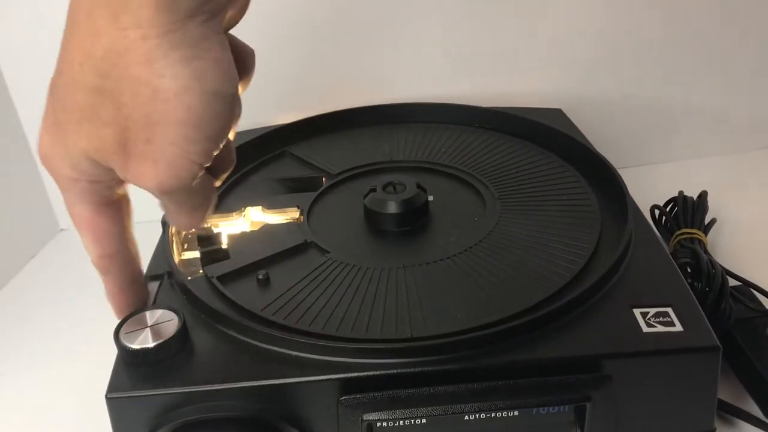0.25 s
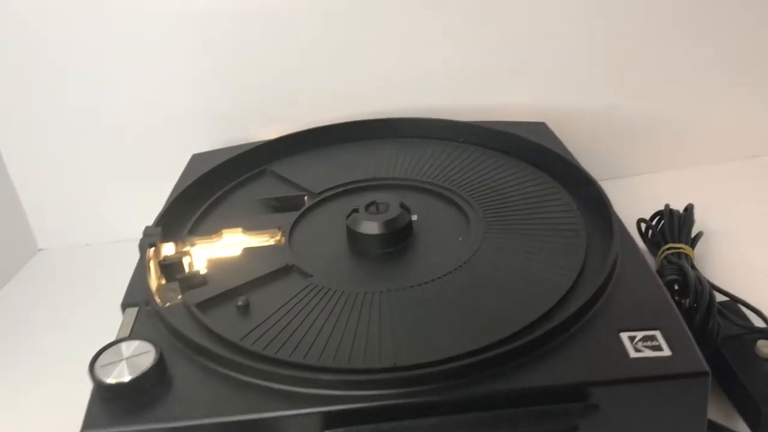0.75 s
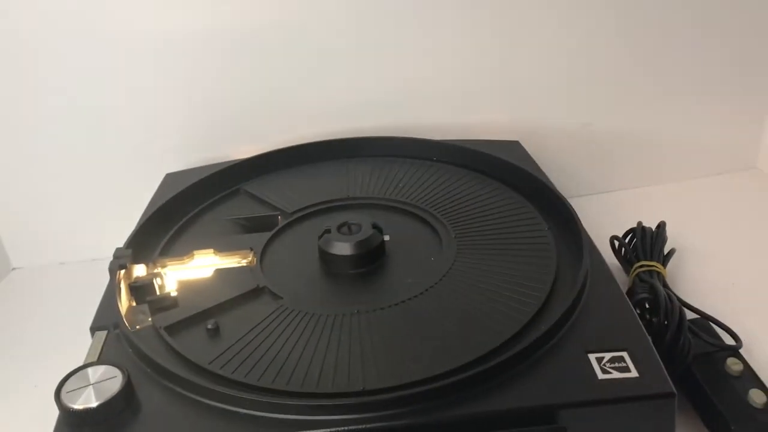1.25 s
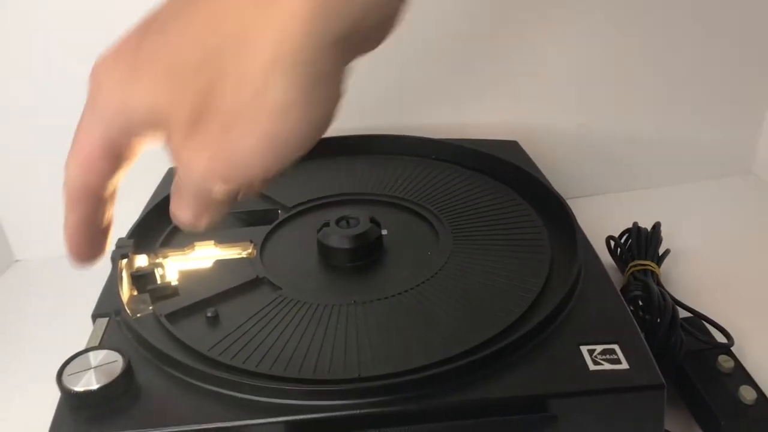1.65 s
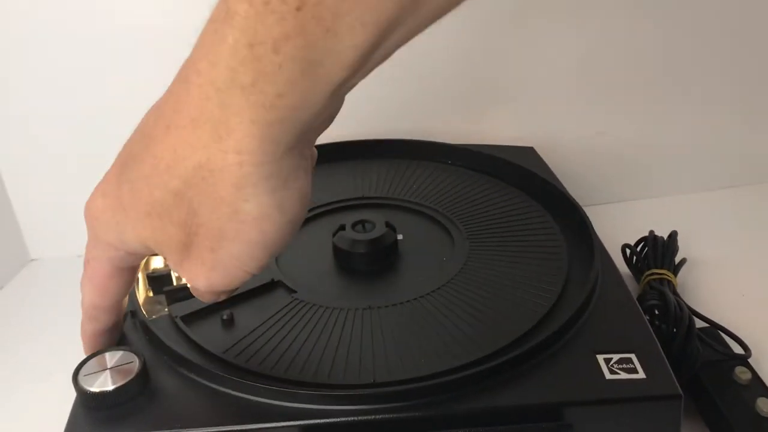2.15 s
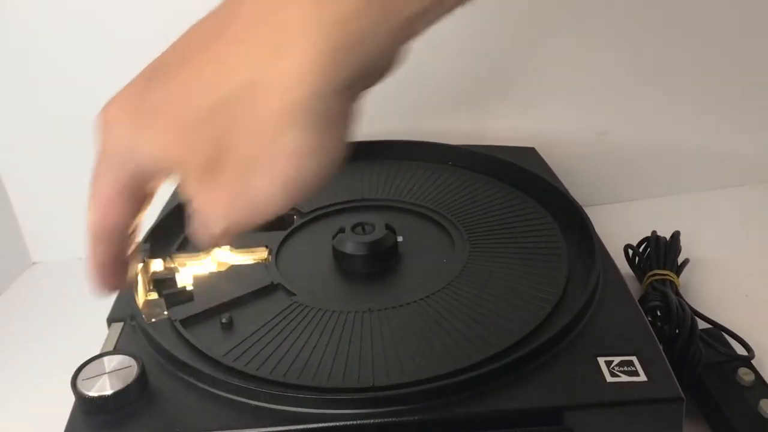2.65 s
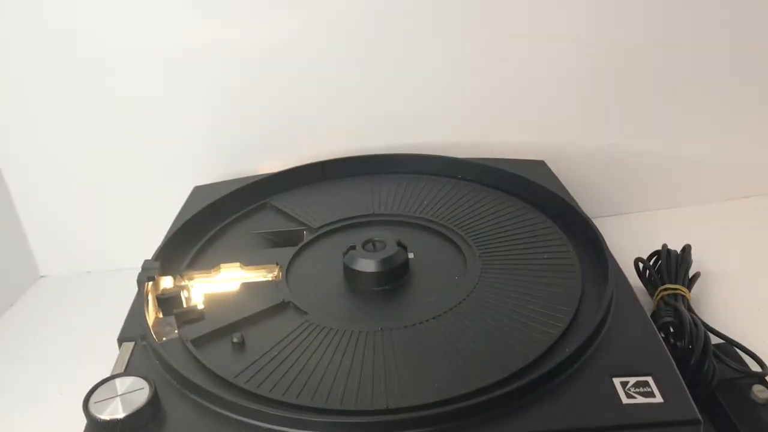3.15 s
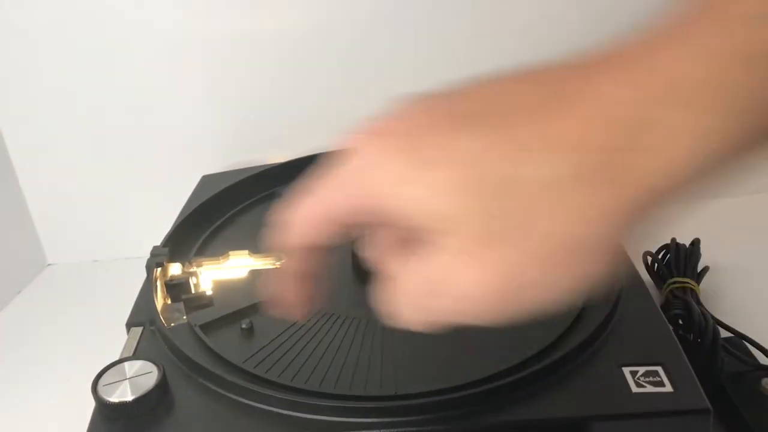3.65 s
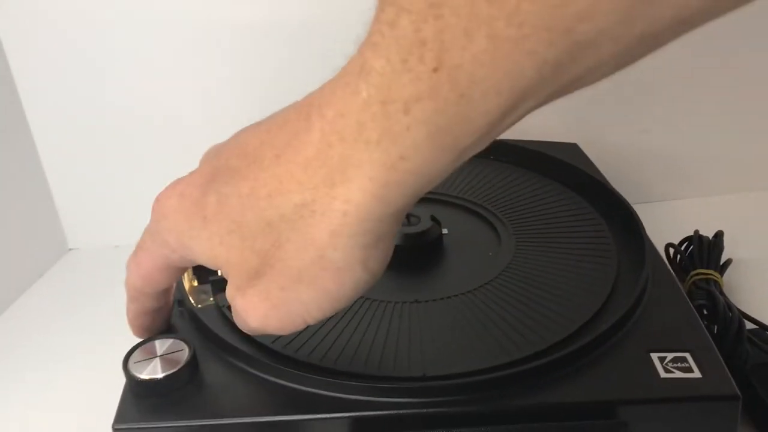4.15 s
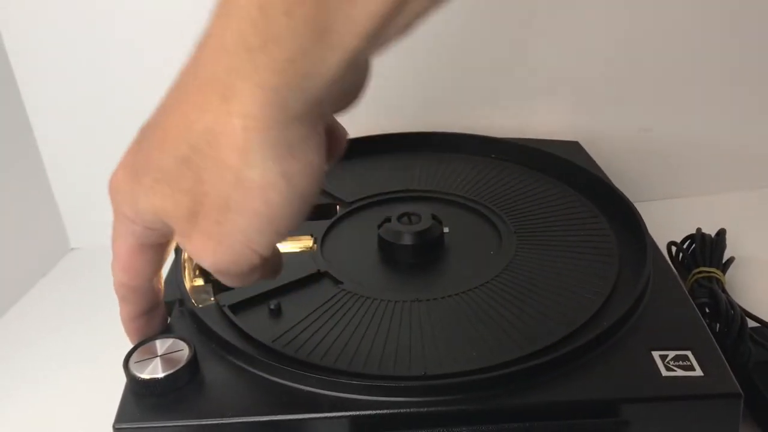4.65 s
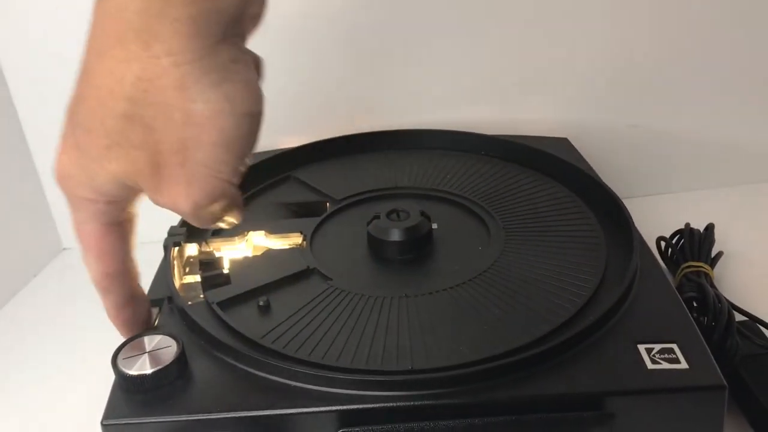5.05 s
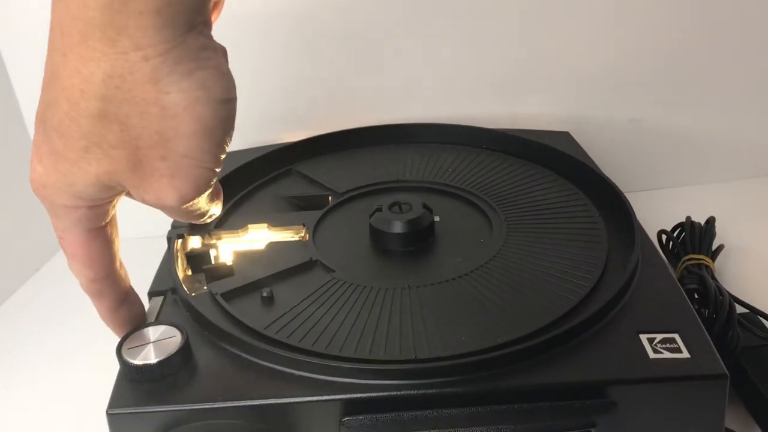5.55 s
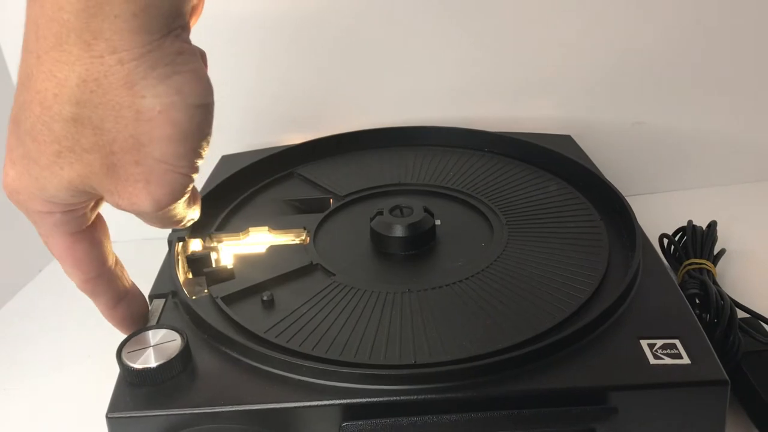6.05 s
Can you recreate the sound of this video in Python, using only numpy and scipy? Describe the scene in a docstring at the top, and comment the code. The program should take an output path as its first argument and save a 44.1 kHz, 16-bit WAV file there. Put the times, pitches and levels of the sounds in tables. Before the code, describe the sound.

A slide projector runs continuously in a small room, heard close up: a fast hollow purr, about twenty-five knocks a second, with a dry rasp, low mains hum, faint irregular gear ticks and soft vent air. An advance already under way ends with a dull stop near 0.1 s; a double knock at 0.3 s releases it, and a sharp snap and clack follow at 0.7 s. A faint finger touch comes at 1.9 s, then a springy ping, short scrape and stop at 2.1-2.4 s, double knock at 2.5 s and loud snap-clack at 3.0 s. A soft touch at 3.8 s precedes another advance at 4.3-4.6 s; small thumps at 5.05 s lead to the return clack at 5.5 s. Touches at 6.2 s begin a last ping and scrape near 6.3 s. The motor slows very slightly with each advance; the changer leaves a short room tail.

```python
"""Small room, slide projector running on a table.
Fan drive: one knock a turn rings the housing, a fast purr with a rasp, over mains hum, gear ticks and air noise.
Slide changer, worked by a finger on a button: advances (ping, scrape, stop, tick), lets go with a double knock,
springs back with a snap and a clack. Its blows are decaying noise bursts, its scrapes random grains, its ping
decaying sines; blows and scrapes are filtered by linkage and case, and the changer gets a room tail."""
import sys
import numpy as np
from scipy import signal
from scipy.fft import rfft, irfft
from scipy.io import wavfile
from scipy.ndimage import uniform_filter1d

SR = 44100
rng = np.random.default_rng(int(sys.argv[2]) if len(sys.argv) > 2 else 0)


def master(y):
    """Save y as 16-bit WAV."""
    cut = np.clip(np.atleast_2d(y).T, -1, 1)
    pcm = np.round(cut * 32767)  # scale
    wavfile.write(sys.argv[1], SR, pcm.astype(np.int16))


N = 277389
TIME = np.arange(N) / SR
FREQ = np.maximum(np.fft.rfftfreq(N, 1 / SR), 1)

# Housing response to a knock: freq_hz, relative_level_db
HOUSING_CURVE = [(300, -39), (465, -12), (505, -21.5), (552, -30), (580, 7), (606, 6), (652, 11),
                 (690, 0.5), (730, 2.5), (770, -10), (860, -28), (1170, -27.5), (2100, -38.5), (3500, -56),
                 (9000, -93.5)]
# Rasp colour: freq_hz, relative_level_db
RASP_CURVE = [(500, -6.5), (900, -3.5), (1400, 2.5), (2100, -4), (2800, -13.5), (6000, -23), (12000, -46.5)]
# Air duct resonances: centre_hz, width_hz, peak_db
DUCT_PEAKS = [(192, 50, 6.5), (1164, 89, 6.5), (1377, 110, 5.5), (1690, 110, 7), (2018, 115, 7.5),
              (2258, 100, 8), (2940, 110, 5.5), (3350, 210, 3), (4430, 160, 4), (5870, 190, 5),
              (7090, 540, 6), (7600, 150, -0.5), (8820, 400, 7.5), (9600, 350, 4)]
# Linkage response to a blow: freq_hz, gain_db
LINKAGE_CURVE = [(100, -21), (300, -10), (600, 18.5), (1000, 11), (2500, 3), (3600, 1), (5000, 2.5),
                 (8000, 2), (10500, -5.5), (13000, -1.5), (15000, 0.5), (16000, -9)]
# Plastic case resonances: centre_hz, width_hz, peak_db
CASE_PEAKS = [(1666, 44, 10), (2190, 140, 3), (2570, 390, 4), (2720, 30, 6.5), (3144, 110, 5),
              (4190, 170, 6), (4530, 160, 6), (5040, 91, 4.5), (5540, 88, 6), (6350, 110, 4.5),
              (6970, 130, 3.5), (8020, 220, 1), (9560, 250, 7.5), (15300, 250, 6.5)]
# Chassis response to a jolt: freq_hz, gain_db
CHASSIS_CURVE = [(80, -19.5), (230, -11.5), (430, -4), (540, -2), (620, 9.5), (760, -21), (1100, -14.5),
                 (2000, -36.5), (6000, -57.5)]
# Coil spring modes: freq_hz, relative_level_db, t60_s
SPRING_MODES = [(4075, -4, .04), (4250, -5, .03), (4380, -2, .045), (4495, -14, .22), (4555, -4, .035),
                (4640, -2, .045), (5319, -18, .06), (6550, -11, .05)]
# Gear tick colour: freq_hz, gain_db
TICK_CURVE = [(2000, -23), (7000, 4.5), (13000, 0), (15000, 3)]
# Motor hum: mains_multiple, rms_level_db
HUM_TONES = [(2, -53), (4, -50.5), (6, -76.5)]
# Motor and fan blade tones, plus a further wavering tone near 953 Hz: mean_freq_hz, mean_rms_level_db
WHIRR_TONES = [(57.4, -63), (178.6, -56.5), (398.5, -62), (952.8, -57), (985.3, -61.5), (1043.7, -59.5),
               (3186, -76)]
# Air through the vents: freq_hz, relative_level_db
AIR_CURVE = [(20, -30), (48, -8), (90, -9.5), (190, -5.5), (320, -5.5), (640, -5.5), (850, -3),
             (1250, -7.5), (1900, -16), (2500, -20), (3900, -23.5), (5000, -33), (5600, -29.5),
             (8400, -32.5), (10500, -41), (15500, -37.5)]

# Blow tables: levels, treble and body are relative; clicks() adds its trims. t60_s is that of the mid band.
# Button presses, each starting an advance: start_s, relative_level_db
ADVANCE_STARTS = [(-.224, 0.5), (2.0701, 1.5), (4.3106, 1), (6.285, -1)]
# Cam blows of an advance (lever engages, slips, hits its stop, pawl drops):
# delay_s, relative_level_db, treble_db, body_db, t60_s
ADVANCE_PATTERN = [(.129, -32, -5, 2, 0.11), (.155, -34.5, 14, -8, 0.045), (.191, -28, 6, 12.5, 0.045),
                   (.314, -17.5, -21, -3.5, 0.03)]
# Linkage lets go, double knock: start_s, first_level_db, second_level_db, body_db
RELEASE_KNOCKS = [(.2848, -14.5, -20.5, 3.5), (2.5245, -17, -14.5, 1), (5.0873, -29.5, -20, 8.5)]
# Changer springs back to rest: start_s, relative_level_db, latch_zing_db
RETURN_STARTS = [(0.7044, 0.5, -27), (3.0, 1, -24), (5.488, 1.5, -30)]
# Blows of a return (warning tick, latch snap, clack, bounce):
# delay_s, relative_level_db, treble_db, body_db, t60_s
RETURN_PATTERN = [(-.068, -35, -28, 11, 0.022), (0, -8.5, 3.5, -8.5, 0.05), (.0245, -8, -5.5, -3, .043),
                  (.044, -26, -7, 7.5, 0.035)]
# Finger lands and shifts on the button: start_s, relative_level_db, treble_db, body_db
FINGER_TOUCHES = [(1.8971, -30.5, 0, 8.5), (3.7886, -25, -27, 10), (5.0437, -18, -20, -0.5),
                  (6.1745, -23, -12, 7.5), (6.203, -29, -14, -16)]

FAN_HZ, FIRST_KNOCK_TURNS = 25.153, .735  # free speed; turns before the first knock
SAG_HZ, SAG_AFTER_S, SAG_WIDTH_S = .21, .12, .38  # speed drop per advance, delay of its deepest point, half width
KNOCK_DB = -25.5
PING_DB = -34
LEVER_AFTER_S, LEVER_SLIDE_S, LEVER_DB = .15, .063, -48
RELEASE_GAP_S, RELEASE_TREBLE_DB, RELEASE_T60_S = .0117, -21, .029
SLIP_LEAD_S, SLIP_S, SLIP_DB = .0099, .023, -47.5
TOUCH_T60_S = .02
MAINS_HZ, TOP_HZ = 60, 16000


def undb(db):
    """Decibels to gain."""
    return 10 ** (np.asarray(db) / 20)


def unit(x):
    """Scale to rms 1."""
    return x / np.sqrt(np.mean(x ** 2))


def walk(rate_hz):
    """Random levels held 1 / rate_hz, slewed twice; spread near 1."""
    hold = int(SR / rate_hz)
    steps = np.repeat(rng.standard_normal(N // hold + 1), hold)
    return 1.3 * uniform_filter1d(uniform_filter1d(steps, hold), hold)[:N]


def colour(x, points, peaks=()):
    """Minimum-phase filter: smooth dB curve over log frequency plus resonances."""
    hz, db = np.transpose(sorted(points))
    curve_db = np.interp(np.log(FREQ), np.log(hz), db)
    for centre_hz, width_hz, peak_db in peaks:
        curve_db = curve_db + peak_db / (1 + (2 * (FREQ - centre_hz) / width_hz) ** 2)
    # folding the cepstrum makes the filter causal
    cepstrum = irfft(np.log(undb(curve_db)), N)
    cepstrum[1:N // 2] *= 2
    cepstrum[N // 2:] = 0
    return irfft(rfft(x) * np.exp(rfft(cepstrum)), N)


def band(x, hz, kind):
    """Second-order low- or high-pass."""
    return signal.sosfilt(signal.butter(2, min(hz, SR / 2 - 1), kind, fs=SR, output="sos"), x)


def fade(t, t60_s):
    """Exponential decay, 60 dB in t60_s."""
    return np.exp(-np.log(1000) * t / max(t60_s, 1e-3))


def rise(t, rise_s):
    """Exponential onset with time constant rise_s."""
    return 1 - np.exp(-t / rise_s)


def add(track, start_s, sound):
    """Mix a sound in at start_s; drop what falls outside."""
    i = int(start_s * SR)
    sound = sound[max(-i, 0):max(N - i, 0)]
    track[max(i, 0):max(i, 0) + len(sound)] += sound


def fan_turns():
    """Turns of the fan so far; each advance loads the motor and slows it a little."""
    load = sum(np.exp(-((TIME - start_s - SAG_AFTER_S) / SAG_WIDTH_S) ** 2) for start_s, _ in ADVANCE_STARTS)
    return np.cumsum(FAN_HZ - SAG_HZ * load) / SR - FIRST_KNOCK_TURNS


def drive(turns, knock_db, jitter_s=.0001, spread_db=.5, wall_s=.0195, wall_db=-21, shiver_db=-21):
    """One knock a turn, each slightly different, swells and dies in the housing; one wall echo."""
    count = np.arange(int(turns[-1]) + 1)
    late, size = rng.standard_normal((2, len(count)))
    times_s = np.interp(count, turns, TIME) + jitter_s * late
    knocks = np.zeros(N)
    knocks[np.clip((times_s * SR).astype(int), 0, N - 1)] = undb(spread_db * size)
    # the spinning fan keeps the housing shivering between knocks
    shiver = undb(shiver_db) * rng.standard_normal(N)
    ring = unit(colour(unit(knocks) + shiver, HOUSING_CURVE))
    echo = np.interp(TIME - wall_s, TIME, ring, left=0)
    return (ring + undb(wall_db) * echo) * undb(knock_db)


def disperse(x, spread_s):
    """Bending waves: the higher part of the ring arrives first, so each knock glides down."""
    lag_s = spread_s * np.clip(np.log2(640 / FREQ), -1 / 4, 1 / 4)
    phase = 2 * np.pi * np.cumsum(lag_s) * SR / N  # group delay integrated over frequency
    return irfft(rfft(x) * np.exp(-1j * phase), N)


def purr(turns, sway_db=.3):
    """Drive knocks wander between round, short ones and longer falling ones."""
    knocks = drive(turns, KNOCK_DB + sway_db * walk(8))
    long_share = np.clip(.5 + .35 * walk(20), 0, 1)
    return (1 - long_share) * disperse(knocks, .002) + long_share * disperse(knocks, .007)


def rub(turns, rub_db=-50, t60_s=.12):
    """Each knock drags a short, soft rasp of gritty noise after it."""
    grit = rng.standard_normal(N) * undb(2 * walk(900))
    since_knock_s = turns % 1 / FAN_HZ
    return unit(colour(grit * fade(since_knock_s, t60_s), RASP_CURVE, DUCT_PEAKS)) * undb(rub_db)


def changer_blows():
    """Blows of finger and changer: start_s, relative_level_db, treble_db, body_db, t60_s."""
    blows = [(*touch, TOUCH_T60_S) for touch in FINGER_TOUCHES]
    for strokes, pattern in ((ADVANCE_STARTS, ADVANCE_PATTERN), (RETURN_STARTS, RETURN_PATTERN)):
        for start_s, stroke_db, *_ in strokes:
            blows += [(start_s + delay_s, stroke_db + db, *tone) for delay_s, db, *tone in pattern]
    for start_s, first_db, second_db, body_db in RELEASE_KNOCKS:
        tone = RELEASE_TREBLE_DB, body_db, RELEASE_T60_S
        blows += [(start_s, first_db, *tone), (start_s + RELEASE_GAP_S, second_db, *tone)]
    return blows


def clicks(blows, trim_db=-11, treble_trim_db=3, body_trim_db=-3, body_ring=2.67, treble_ring=.51):
    """Each blow sets off a dense rattle of small parts; the low body rings longest."""
    out, t = np.zeros(N), TIME[:SR // 4]
    for start_s, db, treble_db, body_db, t60_s in blows:
        low, mid, top = rng.standard_normal((3, len(t)))
        body = band(low, 3340, "low") * undb(body_db + body_trim_db) * fade(t, t60_s * body_ring)
        mid = band(band(mid, 3000, "high"), 12500, "low") * fade(t, t60_s)
        treble = band(top, 9500, "high") * undb(treble_db + treble_trim_db) * fade(t, t60_s * treble_ring)
        add(out, start_s, undb(db + trim_db) * (body + mid + treble) * rise(t, .0007))
    return out


def jolts(blows, trim_db=-4, t60_s=.15):
    """A hollow chassis thud follows each blow, as strong as its low body."""
    out, t = np.zeros(N), TIME[:SR // 4]
    for start_s, db, _, body_db, _ in blows:
        thud = rng.standard_normal(len(t)) * fade(t, t60_s) * rise(t, .0059)
        add(out, start_s, undb(db + body_db + trim_db) * thud)
    return colour(out, CHASSIS_CURVE)


def latch(ring_hz=14750, width_hz=500, t60_s=.054, bounce_s=.044, bounce_db=-14):
    """Returning latch: a short, very high metallic zing (resonated noise) and one faint bounce."""
    out, t = np.zeros(N), TIME[:SR // 8]
    resonator = signal.iirpeak(ring_hz, ring_hz / width_hz, SR)
    for start_s, _, db in RETURN_STARTS:
        for lag_s, drop_db in ((0, 0), (bounce_s, bounce_db)):
            zing = unit(signal.lfilter(*resonator, rng.standard_normal(len(t))))
            add(out, start_s + lag_s, undb(db + drop_db) * zing * fade(t, t60_s) * rise(t, .00082))
    return out


def spring(tick_db=1):
    """As an advance starts, a tick leaves the coil spring ringing in its modes."""
    out, t = np.zeros(N), TIME[:SR // 3]
    for start_s, db in ADVANCE_STARTS:
        ring = sum(undb(mode_db) * fade(t, t60_s) * np.sin(2 * np.pi * (hz * t + rng.random()))
                   for hz, mode_db, t60_s in SPRING_MODES)
        tick = band(rng.standard_normal(len(t)), 4800, "low") * fade(t, .047) * undb(tick_db)
        add(out, start_s, undb(PING_DB + db) * (ring + tick) * rise(t, .00044))
    return out


def changer_slides():
    """Lever scrapes, and slips leading into each release: start_s, length_s, level_db before linkage."""
    levers = [(start_s + LEVER_AFTER_S, LEVER_SLIDE_S, LEVER_DB + db) for start_s, db in ADVANCE_STARTS]
    slips = [(start_s - SLIP_LEAD_S, SLIP_S, SLIP_DB) for start_s, *_ in RELEASE_KNOCKS]
    return levers + slips


def scrapes(slides, grain_rate_hz=450, grain_spread_db=5):
    """Plastic sticks and slips in tiny, uneven grains, each a short noise rattle."""
    out, t = np.zeros(N), TIME[:SR // 50]
    for start_s, length_s, db in slides:
        n = max(int(length_s * SR), 2)
        hits = rng.random(n) < grain_rate_hz / SR
        grains = hits * undb(grain_spread_db * rng.standard_normal(n)) + 1e-9  # never all zero
        swell = np.hanning(n + 2)[1:-1] ** .5
        rattle = rng.standard_normal(len(t)) * fade(t, .021)
        add(out, start_s, undb(db) * unit(signal.fftconvolve(grains * swell, rattle)))
    return out


def changer():
    """All changer sounds; clicks and scrapes ring through linkage and case."""
    blows = changer_blows()
    contacts = colour(clicks(blows) + scrapes(changer_slides()), LINKAGE_CURVE, CASE_PEAKS)
    return contacts + spring() + latch() + jolts(blows)


def ticking(rate_hz=11, tick_db=-55, scatter_db=4, late_periods=.16, t60_s=.023):
    """Faint, high ticks of the running gears, uneven in time and strength."""
    out, t = np.zeros(N), TIME[:SR // 20]
    for k, (late, size) in enumerate(rng.standard_normal((100, 2))):
        tick = rng.standard_normal(len(t)) * fade(t, t60_s)
        add(out, (k + late_periods * late) / rate_hz, undb(tick_db + scatter_db * size) * tick)
    return colour(out, TICK_CURVE)


def motor(waver_db=3, drift_hz=.837):
    """Steady mains hum, and weaker tones wavering in level and pitch."""
    hum = sum(undb(db) * np.sin(2 * np.pi * (multiple * MAINS_HZ * TIME + rng.random()))
              for multiple, db in HUM_TONES)
    whirr = np.zeros(N)
    for hz, db in WHIRR_TONES:
        cycles = np.cumsum(hz + drift_hz * walk(8)) / SR
        whirr += undb(db + waver_db * walk(5.2)) * np.sin(2 * np.pi * cycles)
    return np.sqrt(2) * (hum + whirr)  # rms to peak


def air(air_db=-43, flutter_db=1.5):
    """Turbulent air leaves through the duct: fluttering coloured noise."""
    return unit(colour(rng.standard_normal(N), AIR_CURVE, DUCT_PEAKS)) * undb(air_db + flutter_db * walk(13))


def room(x, wet_db=-13, low_t60_s=.41, mid_t60_s=.38, top_t60_s=.21, mid_db=-9.5, top_db=-4):
    """Adds a short diffuse tail from near walls; the treble dies first."""
    t = TIME[:SR // 2]
    low, mid, top = rng.standard_normal((3, len(t)))
    low = band(low, 1600, "low") * fade(t, low_t60_s)
    mid = band(band(band(mid, 3000, "high"), 9500, "low"), 9500, "low") * fade(t, mid_t60_s) * undb(mid_db)
    top = band(top, 10500, "high") * fade(t, top_t60_s) * undb(top_db)
    tail = (low + mid + top) * rise(t, .00087)
    return x + undb(wet_db) * signal.fftconvolve(x, tail / np.linalg.norm(tail))[:N]


def scene():
    """Running machine, plus the changer in its room."""
    turns = fan_turns()
    machine = purr(turns) + rub(turns) + ticking() + motor() + air()
    return (machine + room(changer()))[None]


def record(dry):
    """Microphone chain: steep low-pass at TOP_HZ."""
    return signal.sosfilt(signal.ellip(10, .2, 80, TOP_HZ, fs=SR, output="sos"), dry)


dry = scene()
out = record(dry)
master(out)
```